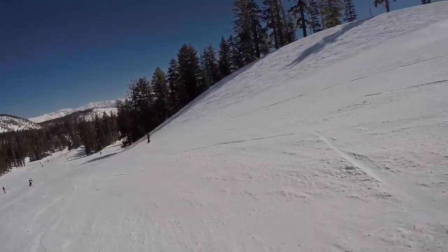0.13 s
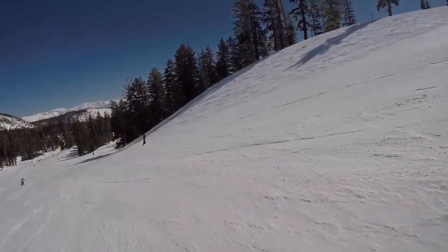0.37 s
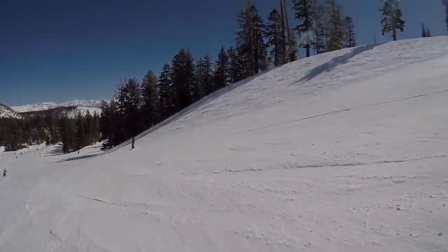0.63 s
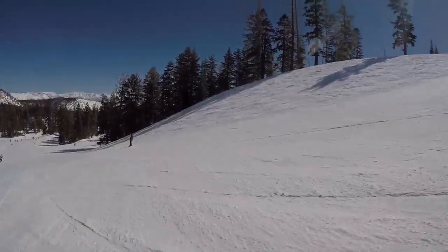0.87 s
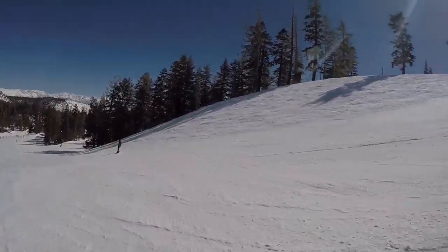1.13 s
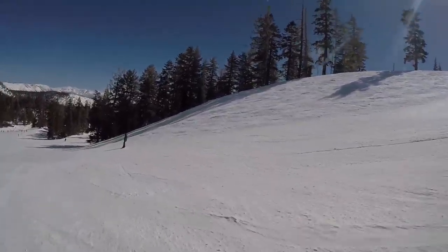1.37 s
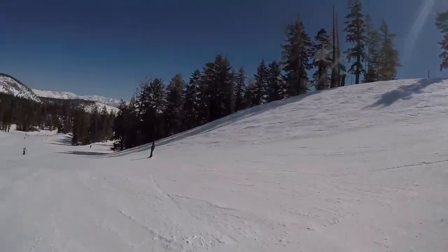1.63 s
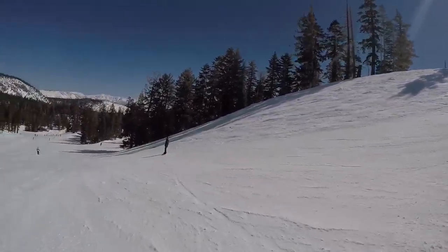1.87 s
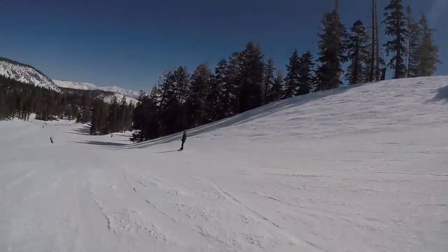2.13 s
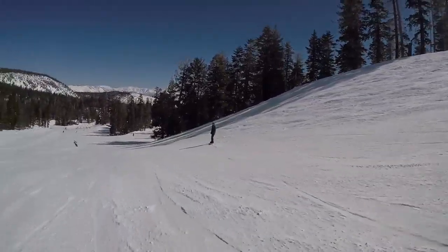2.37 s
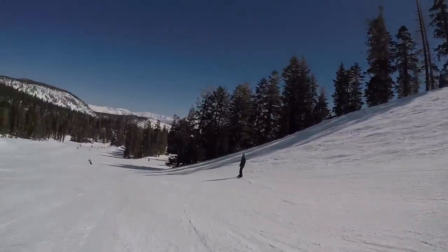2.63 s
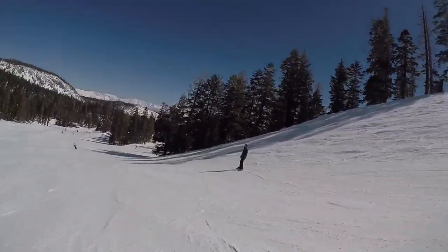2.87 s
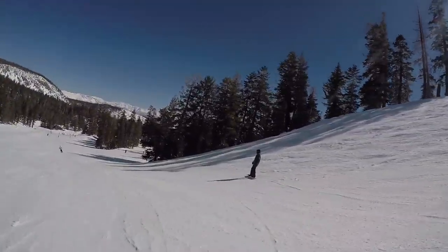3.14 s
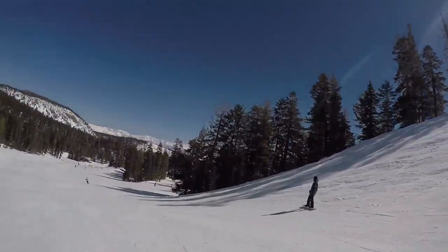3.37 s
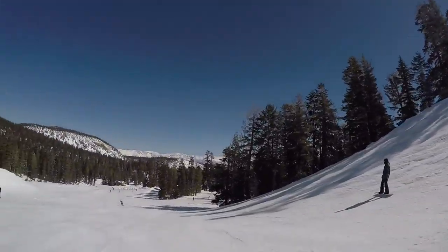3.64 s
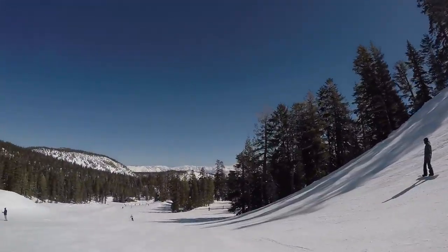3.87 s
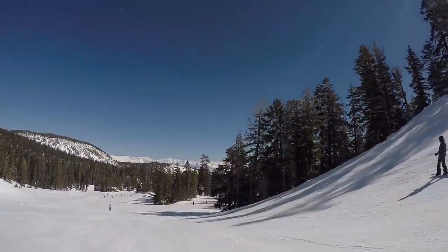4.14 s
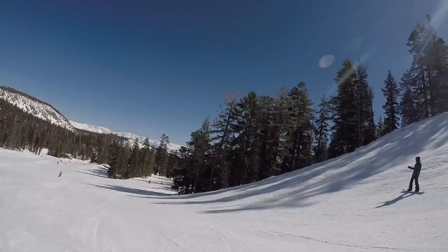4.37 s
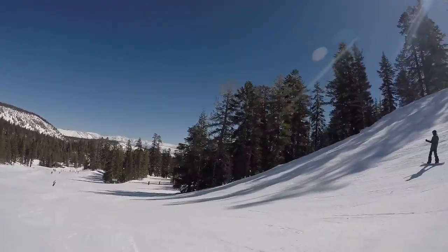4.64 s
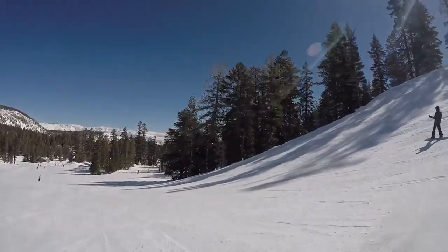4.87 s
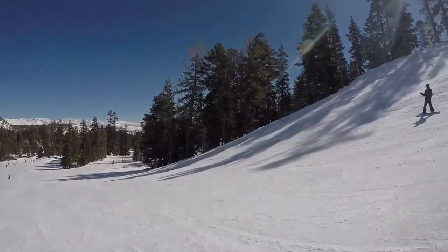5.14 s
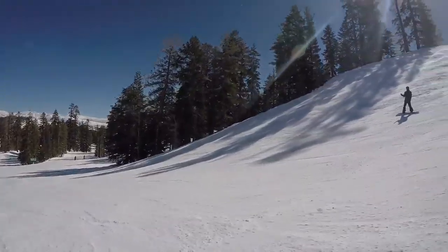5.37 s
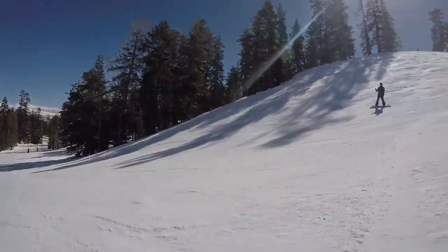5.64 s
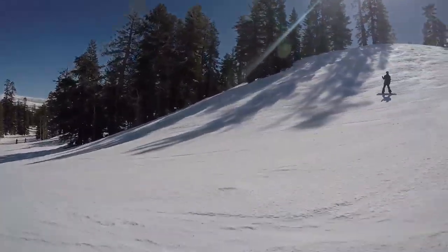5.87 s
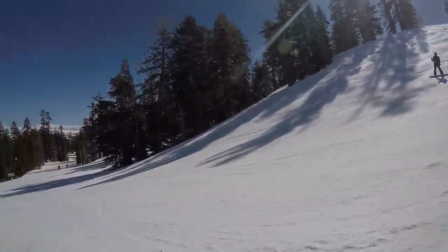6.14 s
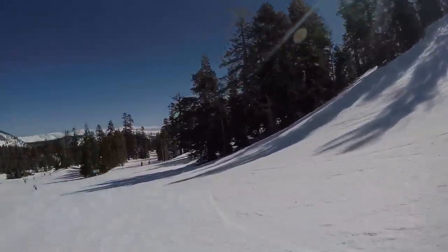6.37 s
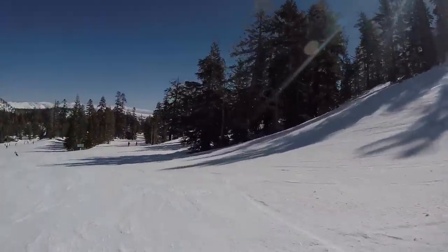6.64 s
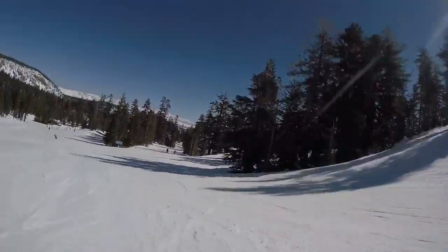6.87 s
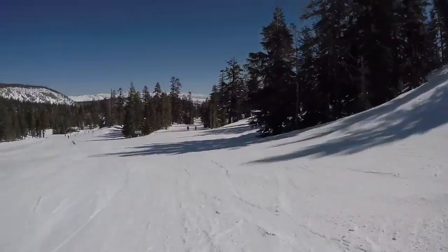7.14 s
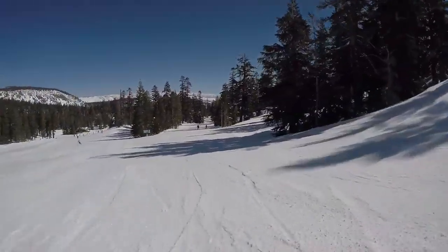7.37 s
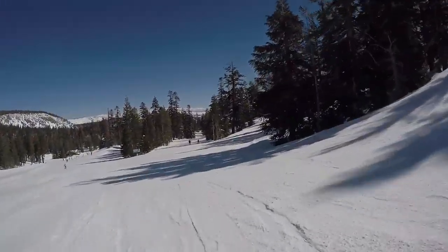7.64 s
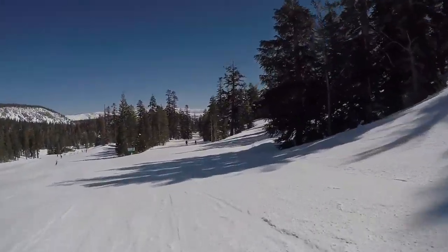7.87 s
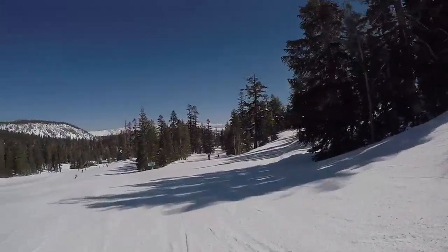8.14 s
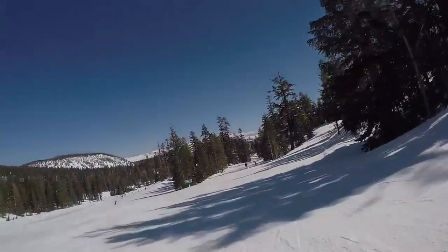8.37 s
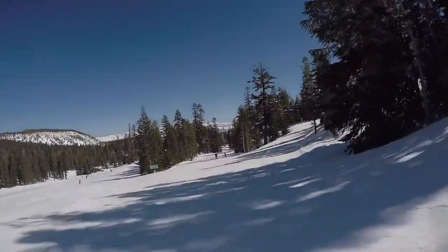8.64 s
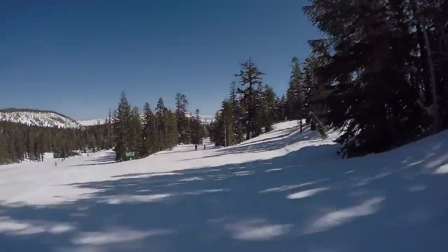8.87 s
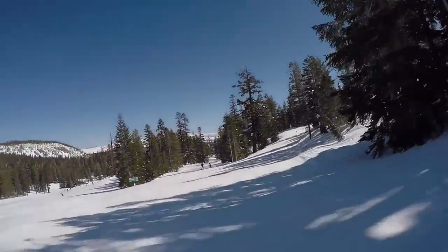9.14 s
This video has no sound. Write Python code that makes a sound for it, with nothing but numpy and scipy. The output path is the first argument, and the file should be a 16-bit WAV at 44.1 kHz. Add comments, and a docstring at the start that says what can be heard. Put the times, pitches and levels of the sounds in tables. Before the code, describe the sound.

Skis crunch and hiss down a packed snow slope under low buffeting wind, interrupted by loud clacks and scraping rubs on the camera case.

```python
"""A small camera in a sealed case rides down a groomed ski slope, under buffeting and fluttering wind.
Crunching skis fade to a rush and a hiss of spray: crushed crystals, many small impulses exciting resonances. A
few light ticks and a jolt come early; from 3 s the wind swells and the edges crunch again. From 6.2 to 7.3 s a
glove bumps and rubs the case: stick-slip scraping, ringing ticks, swings of the mount. Near 8.2 s the crunch
returns with brief high rings of the case, then eases into rush and wind."""
import sys
import numpy as np
from scipy import signal
from scipy.fft import rfft, irfft
from scipy.io import wavfile
from scipy.ndimage import uniform_filter1d

SR = 44100
rng = np.random.default_rng(int(sys.argv[2]) if len(sys.argv) > 2 else 0)


def generate_wav(signal):
    """Clip the signal to [-1, 1] and save it as 16-bit WAV at the path in sys.argv[1]."""
    frames = np.transpose(np.atleast_2d(signal))
    scaled = np.clip(frames, -1, 1) * 32767
    pcm = np.round(scaled).astype(np.int16)
    wavfile.write(sys.argv[1], SR, pcm)


def undo_db(level):
    """Turn decibels back into plain size, where 20 dB means ten times bigger."""
    steps = np.asarray(level, float) / 20
    return 10 ** steps


N = 407925
TIME = np.arange(N) / SR  # s

# spectra of slow and fast pressure swings: f/Hz, relative density/dB
BUFFET_SPECTRUM = [(2, -35), (5, -0.5), (16, -4), (30, -3.5), (47, -8.5), (60, -17.5), (80, -48),
                   (200, -70.5)]
FLUTTER_SPECTRUM = [(40, -34), (65, 8), (100, 2), (150, -8), (230, -16.5), (500, -27.5), (1200, -75)]
# resonances of the solid shell, middle, low and high: f/Hz, width/Hz, relative level/dB
SHELL_MODES = [(1785, 370, 9), (2110, 130, 10), (2310, 140, 6.5), (2880, 75, -2)]
SHELL_LOW_MODES = [(930, 190, -4), (984, 160, -5), (1257, 250, 0)]
SHELL_RASP_MODES = [(3020, 260, 20.5), (4100, 1240, 8), (4600, 300, -18), (5200, 220, 0), (5930, 220, 7)]
RASP_TOP_HZ = 6800


def unit(x):
    """Normalisation: scale to rms 1."""
    return x / np.sqrt(np.mean(x ** 2))


def curves(table):
    """Linear interpolation: the columns of (t/s, value, ..) rows, sample by sample."""
    s, *columns = np.transpose(table)
    return [np.interp(TIME, s, column) for column in columns]


def humps(events):
    """Bell-shaped swells in dB, summed; rows of t/s, fall to 1/e/s, peak/dB, each quicker to rise."""
    rise_share = 0.81  # rise time over fall time
    total_db = 0
    for s, fall_s, db in events:
        width_s = np.where(TIME < s, rise_share * fall_s, fall_s)
        total_db = total_db + db * np.exp(-((TIME - s) / width_s) ** 2)
    return total_db


def walk(rate):
    """Slow random modulation of rms 1: levels held 1 / rate s, smoothed by two moving averages."""
    hold = int(SR / rate)
    steps = np.repeat(rng.standard_normal(N // hold + 1), hold)
    smooth = uniform_filter1d(uniform_filter1d(steps, hold), hold)
    return unit(smooth[:N])


def coloured(spectrum):
    """Spectral shaping: white noise weighted in frequency, at rms 1."""
    hz, db = np.transpose(spectrum)
    log_hz = np.log(np.arange(1, N // 2 + 2) * SR / N)
    gain = undo_db(np.interp(log_hz, np.log(hz), db))
    return unit(irfft(rfft(rng.standard_normal(N)) * gain, N))


def grains(per_s, scatter_db, hiss):
    """Shot noise: sparse clicks, a few much larger than the rest, over a power share of smooth hiss."""
    chance = rng.random((3, N))
    size_db = np.minimum(-scatter_db * np.log(1 - chance[2]), 4 * scatter_db)
    clicks = (chance[0] < per_s / SR) * np.sign(chance[1] - .5) * undo_db(size_db)
    hiss = np.clip(hiss, 0, 1)
    return np.sqrt(1 - hiss) * unit(clicks) + np.sqrt(hiss) * rng.standard_normal(N)


def ring(x, modes, low_hz, top_hz, flicker_db=0., rate=10.):
    """Modal resonance: parallel resonators behind a steep band-pass, each level free to flicker."""
    x = signal.sosfilt(signal.butter(4, [low_hz, top_hz], "band", fs=SR, output="sos"), x)
    out = 0
    for hz, width, db in modes:
        band = signal.lfilter(*signal.iirpeak(min(hz, .45 * SR), hz / width, SR), x)
        flicker = flicker_db * walk(rate) if flicker_db else 0
        out = out + undo_db(db + flicker) * band
    return out


def glove():
    """Stick-slip friction: fabric catches and slips on the shell; the rubbing also sways the mount."""
    # strokes: t/s, scrape level/dB, brightness/dB, groan over scrape/dB, sway level/dB
    strokes = [(6.18, -62, 0, -8, -50), (6.234, -47, -12, -11, -35), (6.3, -47.5, -4, -13, -41),
               (6.412, -46, -10, -9, -40), (6.419, -32.5, 6, 4, -18.5), (6.449, -19.5, 11, -5, -22),
               (6.459, -27, 7.5, -4, -24), (6.47, -29.5, 9, -15, -34), (6.495, -35, 4.5, -10, -25),
               (6.53, -34.5, 9.5, -13, -35), (6.58, -29.5, 0.5, -7, -29), (6.614, -29, -2.5, -7, -35),
               (6.696, -24.5, -2, -10.5, -30), (6.72, -23, 0, -10, -26), (6.75, -20.5, 3.5, -9, -23.5),
               (6.79, -17.5, 1.5, -6, -12), (6.802, -14.5, 2, -4.5, -13), (6.82, -29, -4, -5, -21),
               (6.825, -38, 2, -8, -9), (6.84, -24, -16, -6, -18), (6.85, -36, -4, -2.5, -27),
               (6.9, -32.5, -3, -7, -40), (6.928, -28.5, -6, -9, -29), (6.966, -30.5, 0, -8.5, -29),
               (7.02, -32, -1, -9, -29), (7.07, -30.5, -5.5, -9, -20), (7.102, -30, -7, -12, -32),
               (7.13, -44, -2, -6, -33), (7.19, -50, -10, -12, -48), (7.222, -43.5, 2.5, -12, -26.5),
               (7.26, -55, 6, -18, -40), (7.34, -62, 8, -10, -80)]
    # treble resonances of the shell: f/Hz, width/Hz, relative level/dB
    fizz_modes = [(7400, 1200, 14), (10340, 1200, 8.5), (11800, 1700, 2), (15000, 750, -3)]
    rasp_over_db, fizz_over_db = -12, -26  # over the scrape, at brightness 0
    fizz_per_bright = 0.93  # dB per dB of brightness

    slips = grains(2800, 2.5, .5) * undo_db(1.5 * walk(140))
    # the fingers damp now one resonance, now another
    scrape = unit(ring(slips, SHELL_MODES, 1405, 3330, 2.5, 45))
    groan = unit(ring(slips, SHELL_LOW_MODES, 710, 1506, 2.2, 45))
    rasp = unit(ring(slips, SHELL_RASP_MODES, 3560, RASP_TOP_HZ, 0.92, 40))
    fizz = unit(ring(slips, fizz_modes, 6840, 17000, 1.2, 30))
    sway = coloured(BUFFET_SPECTRUM) + undo_db(-6.5) * coloured(FLUTTER_SPECTRUM)

    scrape_db, bright_db, groan_db, sway_db = curves(strokes)
    rub = scrape + undo_db(groan_db) * groan
    rub += undo_db(rasp_over_db + bright_db) * rasp
    rub += undo_db(fizz_over_db + fizz_per_bright * bright_db) * fizz
    touching = 1. * ((TIME >= strokes[0][0]) & (TIME < strokes[-1][0]))
    touching = uniform_filter1d(touching, size=512)
    return touching * (undo_db(scrape_db) * rub + undo_db(sway_db) * sway)


def knocks():
    """Impulse response: jolts swing the damped mount; ticks ring the shell, duller for long contact."""
    # jolts of the mount: t/s of first swing, peak level/dB, direction (sign)
    jolt_rows = [(1.143, -19, 1), (6.157, -15.5, -1), (6.424, -11.5, 1), (6.446, -14.5, -1),
                 (6.573, -11, -1), (6.735, -13.5, -1), (6.759, -9, -1), (6.781, -19, -1), (6.797, -10, -1),
                 (6.816, -9, -1), (6.844, -13, 1), (6.936, -12, 1), (6.96, -18, -1), (7.023, -16.5, 1),
                 (7.049, -14, 1)]
    # ticks on the case: t/s, drive peak/dB, contact half-width/ms, shove over tick/dB
    tick_rows = [(1.1376, -33, 0.15, 6.5), (1.198, -38, 0.073, -8), (1.275, -43, .12, 0),
                 (2.6052, -27.5, 0.083, -37), (6.15, -22.5, 0.12, 13), (6.396, -35, .07, -10),
                 (6.4186, -8.5, 0.19, -6), (6.446, -6, 0.19, -6.5), (6.798, -8, 0.064, -3),
                 (6.834, -9.5, 0.11, -6), (6.988, -10.5, 0.019, -20), (8.213, -32, 0.044, -20)]
    mount_hz, mount_fade_s = 82.4, 0.0036
    low_per_shove = 0.31  # a glancing tick, with little shove, excites the low resonances less
    rattle_db, rattle_s = -10, 0.0081  # each tick chatters on briefly

    t = np.arange(SR // 16) / SR
    envelope = t / mount_fade_s * np.exp(1 - t / mount_fade_s)
    swing = envelope * np.sin(2 * np.pi * mount_hz * t)
    lead = np.argmax(swing)
    jolts, ticks, lows, shoves = np.zeros((4, N))
    for s, db, direction in jolt_rows:
        jolts[int(s * SR) - lead] += undo_db(db) * np.sign(direction)
    for s, db, contact_ms, shove_db in tick_rows:
        push = undo_db(db) * np.exp(-((TIME - s) * 1000 / max(contact_ms, .01)) ** 2)
        ticks += push
        lows += undo_db(low_per_shove * min(shove_db, 0)) * push
        shoves += undo_db(shove_db) * push

    after = np.arange(SR // 40) / SR
    contacts = (rng.random(len(after)) < 900 / SR) * rng.standard_normal(len(after))
    chatter = undo_db(rattle_db) * np.exp(-after / rattle_s) * contacts
    chatter[0] = 1  # the tick itself
    ticks, lows = (signal.fftconvolve(x, chatter)[:N] for x in (ticks, lows))
    shell = ring(lows, SHELL_LOW_MODES, 590, 2500) + ring(ticks, SHELL_MODES, 720, 2750)
    shell += undo_db(-4.5) * ring(ticks, SHELL_RASP_MODES, 3380, RASP_TOP_HZ)
    # a hard tick also shoves the whole case, a broad dull body under the ring
    body = ring(shoves, [(533, 280, 0)], 125, 2400)
    return signal.fftconvolve(jolts, swing)[:N] + shell - body


def skis():
    """Granular excitation: crystals crushed under the bases drive resonances, modulated by ridges."""
    # swells over the plain glide: t/s, rush level/dB, low crunch of the edges/dB
    ski_levels = [(0, -42.5, -39), (.06, -44, -47), (.2, -43.5, -50), (.25, -50.5, -57.5),
                  (.34, -52, -60.5), (.75, -53.5, -57), (.95, -60.5, -63), (1.15, -54, -73),
                  (1.5, -57, -74), (2.1, -54.5, -74), (2.7, -55.5, -72), (2.95, -52.5, -58.5),
                  (3.02, -48.5, -47.5), (3.12, -48.5, -47), (3.5, -48.5, -47.5), (3.75, -52.5, -48.5),
                  (4.2, -50.5, -56), (4.28, -58, -61), (4.5, -55.5, -98), (4.7, -57, -69), (4.76, -61, -60),
                  (5.8, -59, -62.5), (6.4, -53.5, -52), (6.8, -57, -48.5), (7.1, -55, -51.5),
                  (7.32, -61, -62.5), (7.6, -55.5, -69.5), (8.208, -55, -59.5), (8.214, -46, -47),
                  (8.27, -50.5, -53), (8.3, -45, -48.5), (8.42, -44, -48.5), (8.62, -54, -54),
                  (8.78, -53, -56.5), (9.05, -54.5, -70), (9.25, -51, -56)]
    # treble swells over the plain glide: t/s, spray level/dB, fine mist level/dB
    treble_levels = [(0, -58, -64), (.3, -63.5, -67), (.85, -76, -72.5), (1.2, -61.5, -67),
                     (1.5, -70.5, -72), (2.0, -65.5, -68), (2.5, -63, -68), (2.72, -71, -73),
                     (2.95, -61, -65.5), (3.6, -60, -64), (4.3, -62, -67), (4.47, -60.5, -63),
                     (4.74, -63, -67), (4.82, -72, -75), (6.13, -66.5, -70.5), (7.3, -75, -80),
                     (7.6, -60.5, -70.5), (8.0, -62, -71.5), (8.55, -60.5, -70), (8.7, -65, -75),
                     (9.25, -60, -71)]
    # the plain glide that never stops: rush, spray, fine mist, crunch level/dB
    glide_levels = [-62, -69, -75.5, -72]
    # edges digging in for a moment: t/s, fall to 1/e/s, level added to the rush/dB
    surges = [(.65, 0.049, 5), (2.0, 0.021, 4), (3.11, 0.019, 5), (3.31, 0.089, 4), (3.45, 0.033, 2),
              (3.63, 0.073, 7), (3.735, .02, 10.5), (3.87, 0.052, 8.5), (4.03, 0.063, 5.5),
              (4.17, 0.046, 6), (5.26, 0.021, 7.5), (8.68, 0.016, 3.5), (9.21, 0.023, 3.5)]
    # bursts of spray: t/s, fall to 1/e/s, level added/dB
    bursts = [(5.6, .06, 8), (5.84, .05, 7.5), (8.83, 0.03, 8)]
    # brief rings of the case's own resonances: t/s, half-width/s, mean f/Hz, peak level/dB
    case_rings = [(8.225, 0.011, 4230, -47.5), (8.286, 0.011, 4230, -51), (8.33, .025, 3500, -51)]
    # resonances for rush, spray, mist and crunch: f/Hz, width/Hz, relative level/dB
    rush_modes = [(813, 61, 5.5), (1100, 1400, -9), (1807, 445, 7.5), (2350, 690, 0.5), (3415, 266, 5),
                  (3910, 390, -8.5), (4266, 145, 1)]
    spray_modes = [(5740, 230, 15.2), (6320, 790, 21), (7130, 510, 10)]
    mist_modes = [(9040, 1500, -6), (10300, 1700, -1), (11900, 2200, -0.5), (14700, 3200, -3.5)]
    crunch_modes = [(220, 200, -6.5), (303, 94, 3.5), (445, 89, -10.5), (520, 500, -29)]
    surge_in_crunch, surge_in_spray = 0.3, 0.35  # shares of a surge's dB

    (rush_db, crunch_db), (spray_db, mist_db) = curves(ski_levels), curves(treble_levels)
    surge_db, burst_db = humps(surges), humps(bursts)
    rush_db = rush_db + surge_db
    crunch_db = crunch_db + surge_in_crunch * surge_db + 1.24 * walk(20)
    spray_db = spray_db + surge_in_spray * surge_db + burst_db + 1.36 * walk(10)
    mist_db = mist_db + burst_db

    rush = unit(ring(grains(3000, 4.9, 0.59), rush_modes, 537, 4370, 0.82, 14))
    crunch = unit(ring(grains(600, 1.9, 0.84), crunch_modes, 152, 1040, 1.7, 18))
    powder = grains(5000, 2.7, 0.44)
    spray = unit(ring(powder, spray_modes, 5100, 8710, 1.0, 9.8))
    mist = unit(ring(powder, mist_modes, 7880, 17200, 1.0, 12))
    layers = (rush, spray, mist, crunch)
    swells = (rush_db, spray_db, mist_db, crunch_db)
    out = np.zeros(N)
    for layer, swell_db, glide_db in zip(layers, swells, glide_levels):
        out += np.hypot(undo_db(swell_db), undo_db(glide_db)) * layer  # powers add

    # a loaded edge tears coarser crystals: the harder the rush, the more it gathers in the middle
    tear = unit(ring(grains(1500, 3.0, 0.49), rush_modes, 1470, 2610, 0.59, 25))
    out += undo_db(rush_db - 2.5 + 0.5 * (rush_db + 44)) * tear
    for s, length, hz, db in case_rings:
        phase = 2 * np.pi * np.cumsum(hz + 40 * walk(150)) / SR
        out += undo_db(db) * np.exp(-((TIME - s) / length) ** 2) * np.sin(phase)
    ridges_db = .9 * walk(35)  # all layers stutter together
    patches_db = .7 * walk(18)  # harder and softer patches of snow
    return undo_db(ridges_db + patches_db) * out


def wind():
    """Turbulent pressure: slow random swings of the air on the case, with faster flutter in puffs."""
    # air on the case, before gusts and puffs: t/s, buffet level/dB, flutter level/dB
    air_levels = [(0, -37.5, -55.5), (.9, -38.5, -57), (1.6, -30.5, -55.5), (2.0, -31, -58.5),
                  (2.9, -30.5, -56), (3.3, -25.5, -50), (3.5, -30.5, -54), (4.2, -33, -58.5),
                  (4.9, -30.5, -53.5), (5.5, -36.5, -49.5), (6.1, -29, -55), (7.3, -36, -58.5),
                  (8.0, -40, -59), (8.7, -37.5, -59.5), (9.25, -32.5, -57)]
    # strongest puffs of flutter: t/s, fall to 1/e/s, level added/dB
    puffs = [(1.64, 0.12, 7), (2.27, 0.043, 15.5), (2.7, 0.12, 9.5), (5.05, 0.043, 6), (9.01, 0.05, 11)]
    gust_db, gusts_per_s, puff_db, puffs_per_s = 2.5, 6, 3.5, 11

    buffet_db, flutter_db = curves(air_levels)
    buffet_db = buffet_db + gust_db * walk(gusts_per_s)
    flutter_db = flutter_db + humps(puffs) + puff_db * walk(puffs_per_s) + 3.1 * walk(22)
    buffet = undo_db(buffet_db) * coloured(BUFFET_SPECTRUM)
    flutter = undo_db(flutter_db) * coloured(FLUTTER_SPECTRUM)
    return buffet + flutter


def scene():
    """Superposition: all sources add at the one microphone inside the case."""
    return (wind() + skis() + glove() + knocks())[None]


def low_pass(x):
    """Removes everything above the highest recorded frequency."""
    return signal.sosfilt(signal.butter(12, 15450, fs=SR, output="sos"), x)


def record(dry):
    """Soft saturation and low-pass filtering: the input stage rounds the loudest peaks and cuts the top."""
    top = signal.ellip(10, .2, 70, 15300, fs=SR, output="sos")  # ripple dB, stop dB, edge Hz
    rounded = np.tanh(0.82 * dry) / 0.78
    mix = signal.sosfilt(top, rounded)
    return low_pass(mix)


dry = scene()
out = record(dry)
generate_wav(out)
```